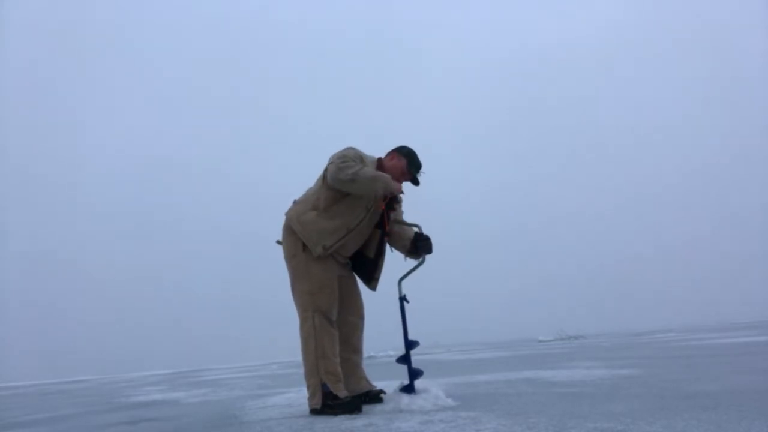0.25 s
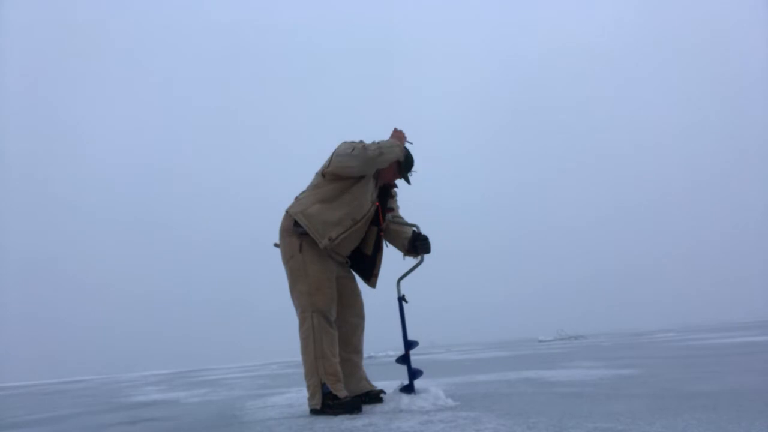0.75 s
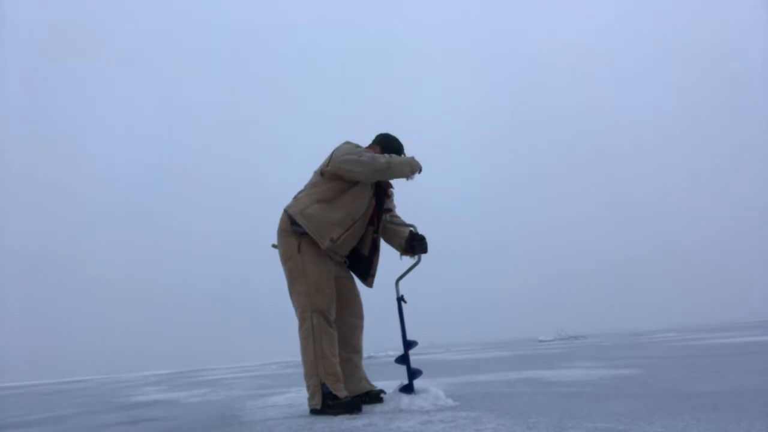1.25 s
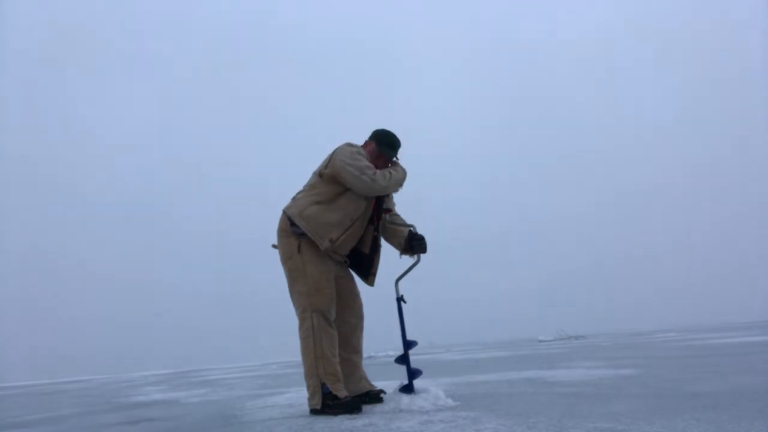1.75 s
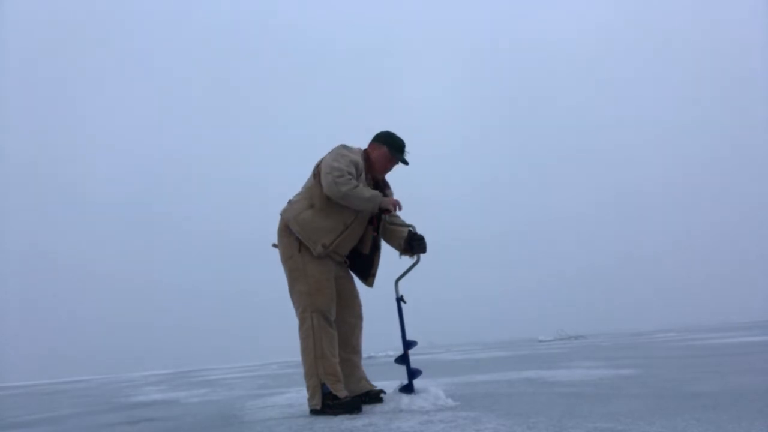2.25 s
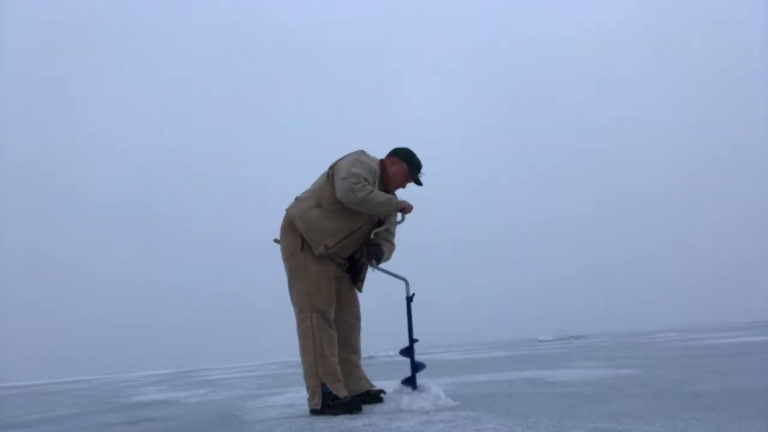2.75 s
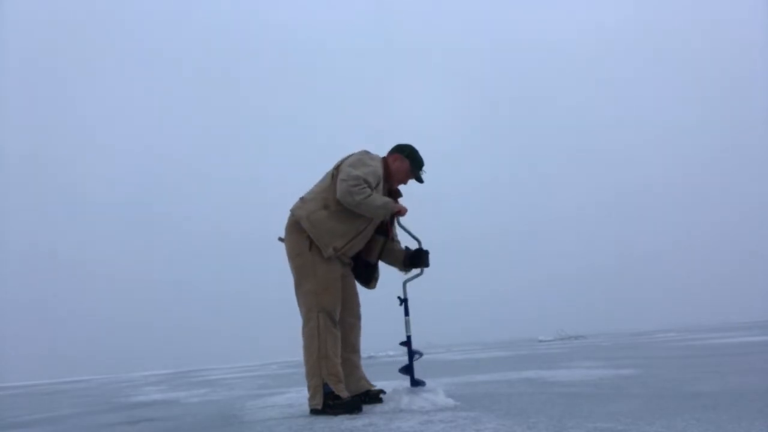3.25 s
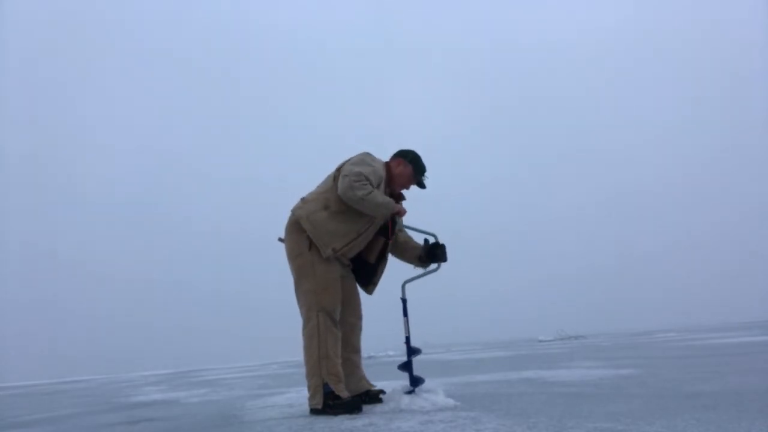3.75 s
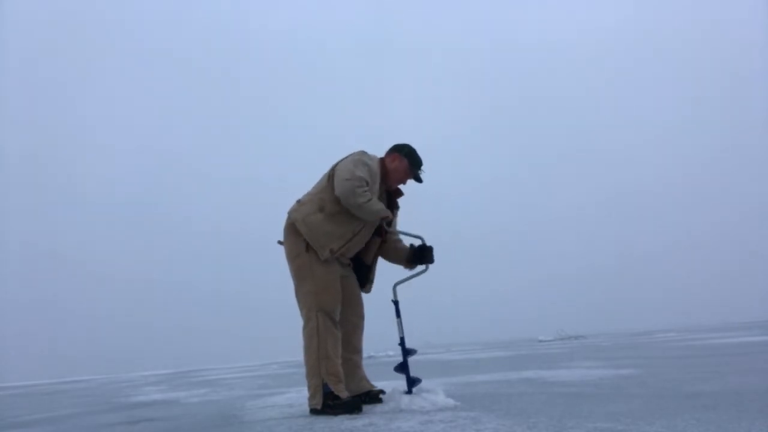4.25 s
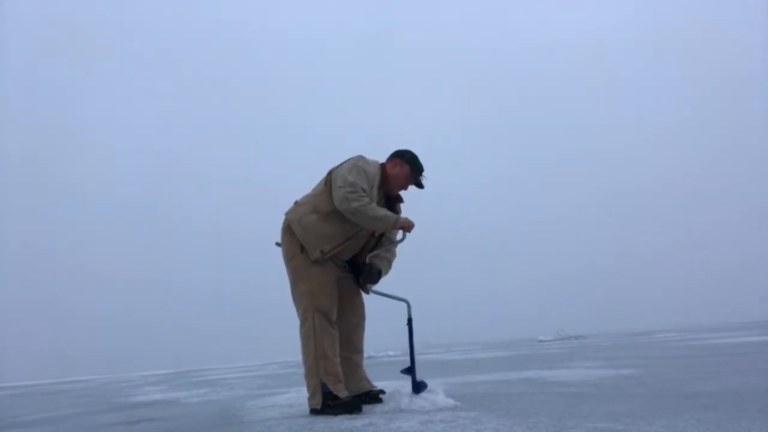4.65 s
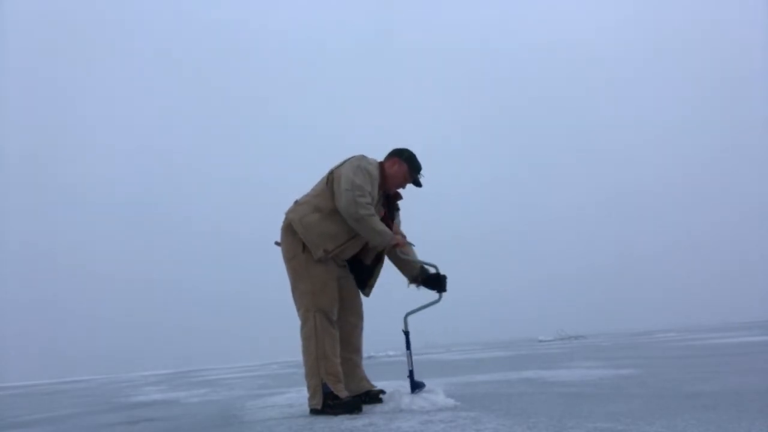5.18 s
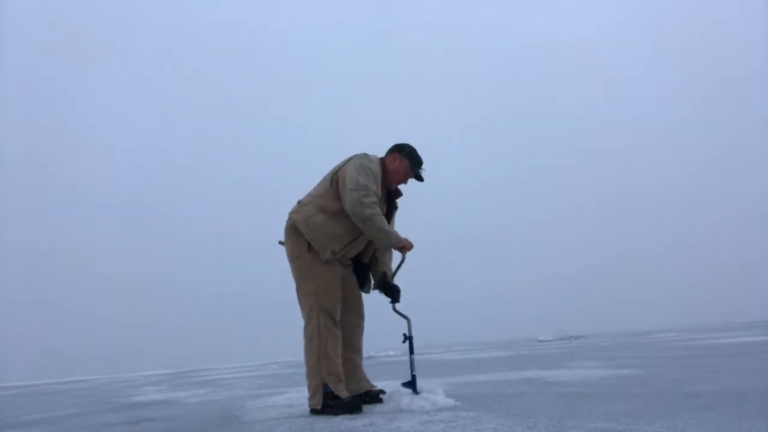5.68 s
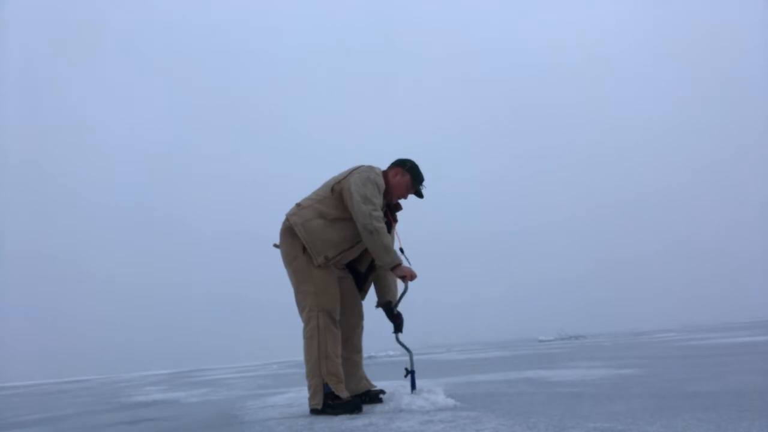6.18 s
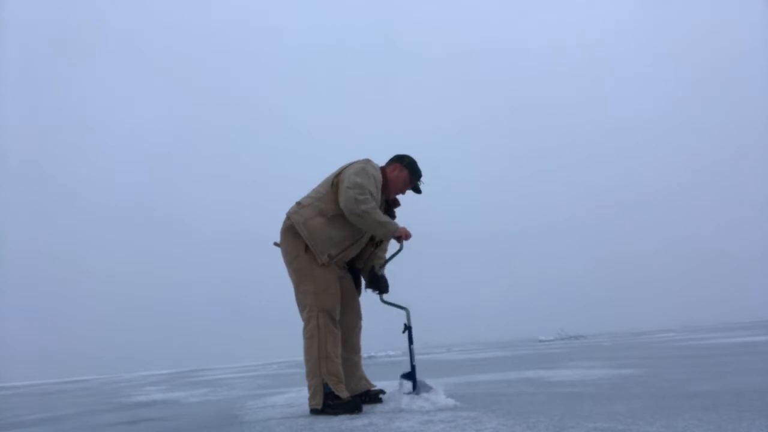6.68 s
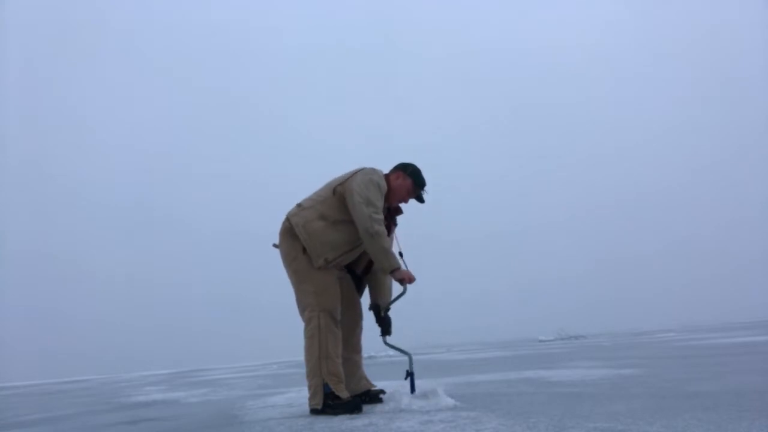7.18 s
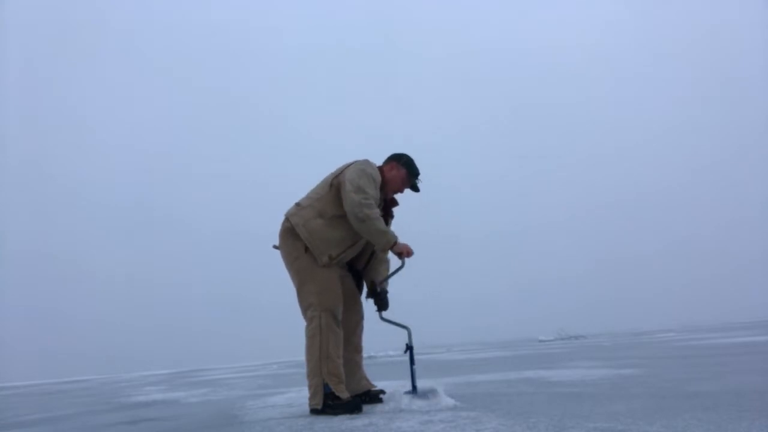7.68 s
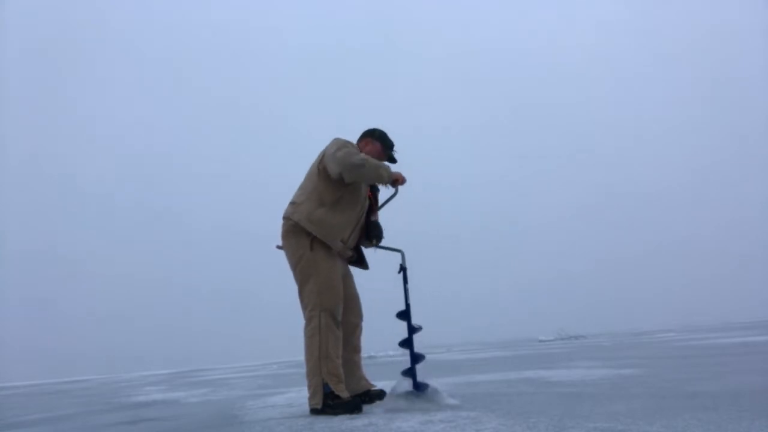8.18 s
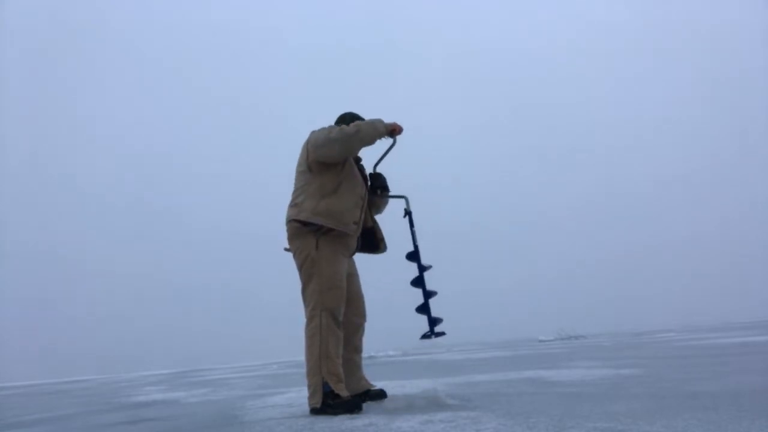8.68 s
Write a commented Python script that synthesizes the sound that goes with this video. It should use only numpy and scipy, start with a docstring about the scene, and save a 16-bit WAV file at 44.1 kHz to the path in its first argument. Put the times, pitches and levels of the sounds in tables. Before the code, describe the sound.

A hand-cranked auger crunches through dry lake ice in fits and starts, breaks into sloshing, gurgling slush, then lifts out dripping in faint wind.

```python
"""A hand auger bores through lake ice, in open air with a light wind.
The steel blades shave dry ice, stall, chip and break through: runs and bursts of tiny random fractures.
Then the spiral churns slush and water in the hole: swarms of short bubbles, slaps and gliding gulps.
It is lifted out with slush spilling off it. The blades ring, small ticks and drops tap, and a faint echo
tail, rumbling wind and rustling air made from filtered noise lie behind it all."""
import sys
import numpy as np
from scipy import signal
from scipy.io import wavfile
from scipy.ndimage import uniform_filter1d

SR = 44100
rng = np.random.default_rng(int(sys.argv[2]) if len(sys.argv) > 2 else 0)


def generate_wav(sig):
    """Save sig (samples, or channels by samples) to the path in sys.argv[1] as 16-bit PCM at SR."""
    pcm = np.round(np.clip(np.atleast_2d(sig).T, -1, 1) * 32767).astype(np.int16)
    wavfile.write(sys.argv[1], SR, pcm)


N = 393813
TIME = np.arange(N) / SR
# water enters the hole, the spiral leaves it, the last slush has run off
FLOOD_S, LIFT_S, DRAINED_S = 5.45, 7.915, 8.49


def amp(db):
    """Turns decibels into a gain."""
    return 10 ** (np.asarray(db) / 20)


def unit(x):
    """Scales a sound to an average (rms) level of one."""
    return x / np.sqrt(np.mean(x ** 2) + 1e-20)


def add(mix, s, sound):
    """Mixes a sound in, starting at s seconds."""
    part = mix[max(round(s * SR), 0):][:len(sound)]
    part += sound[:len(part)]


def follow(rows):
    """Gain curve through rows of (time_s, level_db), silent before the first and after the last."""
    s, db = np.transpose(rows)
    inside = np.interp(TIME, s, np.ones(len(s)), 0, 0)
    return inside * amp(np.interp(TIME, s, db))


def strokes(rows, attack_s, sag_db_per_s, release_s):
    """Gain from rows of (start_s, length_s, level_db): each sets in, sags while it lasts, and dies away."""
    gain = np.zeros(N)
    for start, length, db in rows:
        t = TIME - start
        edges = np.minimum(t, 0) / attack_s - np.maximum(t - length, 0) / release_s
        near = edges > -10
        sagging = amp(db - sag_db_per_s * np.clip(t[near], 0, length))
        gain[near] = np.maximum(gain[near], sagging * np.exp(edges[near]))
    return gain


def swells(rows):
    """Gain from rows of (middle_s, half_width_s, level_db): each is a smooth hump."""
    return sum(amp(db) * np.exp(-np.minimum(((TIME - s) / width) ** 2, 20)) for s, width, db in rows)


def colour(x, points, size=4096):
    """Filters to a given spectrum without any sound ahead of a click, so that clicks keep their attack."""
    hz, db = np.transpose(points)
    bin_hz = abs(np.fft.fftfreq(size, 1 / SR))
    log_gain = np.log(amp(np.interp(np.log(bin_hz + 1), np.log(hz), db)))
    minimum_phase = np.exp(np.conj(signal.hilbert(log_gain)))
    taps = np.fft.ifft(minimum_phase).real[:size // 2]
    return signal.oaconvolve(x, taps)[:len(x)]


def band(x, hz, kind, order=3):
    """Keeps what lies below ("low") or above ("high") a frequency."""
    return signal.sosfilt(signal.butter(order, hz, kind, fs=SR, output="sos"), x)


def resonate(x, hz, width_hz):
    """A resonance with a gain of one at its centre."""
    return signal.lfilter(*signal.iirpeak(hz, hz / width_hz, fs=SR), x)


def steady(x, seconds):
    """Evens out the slow changes of level and leaves the fine grain."""
    size = int(seconds * SR)
    power = uniform_filter1d(uniform_filter1d(x ** 2, size), size)
    return x / np.sqrt(abs(power) + 1e-3 * np.mean(x ** 2))  # the small floor avoids lifting silence


def grains(per_s, spread_db, clump_db, clump_s):
    """Tiny fractures: single-sample clicks of very unequal size, swelling and thinning in clumps."""
    sizes = amp(spread_db * np.minimum(rng.exponential(1, N), 4)) * rng.choice([-1, 1], N)
    clumps = unit(band(rng.standard_normal(N), 1 / (2 * np.pi * clump_s), "low", order=2))
    return sizes * (rng.random(N) < per_s / SR) * amp(clump_db * clumps)


def bubbles(low_hz, high_hz, per_s, cycles, rise, count=28):
    """A swarm of short bubbles, each a decaying tone that rises a little in pitch as it dies."""
    out = np.zeros(N)
    for hz in np.geomspace(low_hz, high_hz, count):
        # life reaches one when the tone has made this many cycles
        life = np.arange(int(5 * cycles / hz * SR)) * hz / (cycles * SR)
        tone = np.sin(2 * np.pi * cycles * life * (1 + rise * life))
        ping = tone * np.exp(-life) * (1 - np.exp(-6 * life))
        births = np.flatnonzero(rng.random(N) < per_s / count / SR)
        train = np.zeros(N)
        train[births] = amp(3.45 * np.minimum(rng.exponential(1, len(births)), 3))
        out += signal.oaconvolve(train, ping)[:N]
    return out


# resonances of the auger seated in the ice: (pitch_hz, width_hz, level_db over the direct sound)
AUGER_RESONANCES = [(222, 25, -4), (332, 47, -4), (803, 32, -18), (1500, 280, -0.5), (2920, 210, 3),
                    (4025, 170, 0), (7250, 27, 9.5), (7330, 31, -7)]


def auger_body(x):
    """The shaft and spiral add their resonances to whatever the blades do."""
    return x + sum(amp(db) * resonate(x, hz, width) for hz, width, db in AUGER_RESONANCES)


def turning(x, drift_s=0.07, t60=0.02, size=1024):
    """The spiral rattles after each fracture, in colours that keep changing as the auger turns."""
    out, hop = np.zeros(N), int(drift_s * SR)
    fade = np.sin(np.pi * np.arange(2 * hop) / (2 * hop))
    decay = amp(-60 * np.arange(size) / SR / t60)
    for i in range(0, N - 2 * hop, hop):
        tail = rng.standard_normal(size) * decay  # a new rattle for each overlapping slice
        rattle = signal.fftconvolve(x[i:i + 2 * hop] * fade, tail / np.linalg.norm(tail))
        add(out, i / SR + 0.003, rattle)
    return out


# tone colour of blades in dry ice: (pitch_hz, level_db)
SHAVING_COLOUR = [(60, -47), (120, -18), (230, -13), (335, -6), (540, -12.5), (750, -2.5), (1500, -4.5),
                  (2300, -9.5), (3400, -16), (7000, -19.5), (8200, -25.5), (16000, -30.5)]
# the one long run of the blades through dry ice: (time_s, level_db)
LONG_RUN = [(2.36, -67), (2.44, -51.5), (2.48, -35.5), (2.575, -25.5), (2.66, -28), (2.81, -36),
            (2.87, -27.5), (2.96, -28), (3.02, -33), (3.25, -30.5), (3.395, -43.5), (3.44, -84)]
# short shoves on the crank before the blades stall again: (start_s, length_s, level_db)
CRANK_SHOVES = [(3.775, .11, -41.5), (3.945, 0.027, -44.5), (4.1, .07, -47), (4.205, 0.036, -24.5),
                (4.37, 0.012, -36), (4.915, 0.098, -54.5)]
DRUM_DB, SPRAY_DB = -13.5, -5.5  # ice sheet and chips against the cutting level
# the sheet drums harder as the long run grinds to a halt
STALL_S, STALL_WIDTH_S, STALL_DRUM_DB = 3.41, 0.13, 13


def shaving():
    """Blades plane dry ice: a run of fractures that drums on the sheet and throws a fine spray of chips."""
    clicks = grains(per_s=2400, spread_db=3.5, clump_db=2.5, clump_s=0.0032)
    fractures = auger_body(colour(clicks, SHAVING_COLOUR))
    fractures = unit(fractures) + amp(-3.0) * unit(turning(fractures))
    crunch = steady(band(band(fractures, 2450, "low"), 494, "high", order=4), 0.024)
    sheet = steady(band(fractures, 398, "low", order=5), 0.036)
    spray = steady(band(fractures, 4600, "high"), 0.021)
    shoves = strokes(CRANK_SHOVES, attack_s=0.021, sag_db_per_s=34, release_s=0.027)
    level = follow(LONG_RUN) + shoves
    drum = amp(DRUM_DB + STALL_DRUM_DB * np.exp(-((TIME - STALL_S) / STALL_WIDTH_S) ** 2))
    # the edges catch and slip
    catch = amp(1.7 * unit(band(rng.standard_normal(N), 35, "low", order=2)))
    return level * catch * (amp(-1.0) * crunch + drum * sheet + amp(SPRAY_DB) * spray)


def cascade_burst(db, hz, treble_db, decay_s, build_s, thud_db, size=4096):
    """A quick cascade of fractures: a bright snap, a hollow knock from the hole and a low thud."""
    t = np.arange(size) / SR
    since = t - 4 * build_s  # small fractures lead up to the break
    noise, uneven = rng.standard_normal((2, size))
    cascade = noise * amp(1.3 * uneven) * np.exp(np.minimum(since / build_s, -since / decay_s))
    knock = band(band(resonate(cascade, hz, 650), 583, "high"), 2080, "low", order=2)
    snap = band(band(cascade, 2600, "high", order=2), 3900, "low", order=1)
    thud = band(band(cascade, 370, "low"), 196, "high")
    burst = amp(-9) * unit(knock) + amp(treble_db - 8) * unit(snap) + amp(thud_db) * unit(thud)
    return amp(db) * burst * np.sqrt(0.8 * decay_s / t[-1])


# dry ice breaking: (time_s, level_db, pitch_hz of the hollow knock)
ICE_CRACKS = [(2.478, -20.5, 1370), (2.567, -20.5, 1400), (2.765, -13, 1450), (2.83, -23, 1460),
              (2.868, -22, 1180), (3.309, -17, 956), (3.398, -25.5, 899), (3.47, -49.5, 1400),
              (3.548, -43.5, 1430), (3.626, -47.5, 1760), (3.751, -29.5, 1530), (3.774, -30, 1490),
              (4.185, -12.5, 1050), (4.226, -14, 1510), (4.359, -22.5, 1810), (4.815, -38.5, 1560),
              (4.888, -34.5, 611), (4.911, -30.5, 700), (4.921, -34, 1000), (4.957, -30.5, 622),
              (4.972, -31.5, 1630), (5.0, -27, 1140), (5.012, -25, 1130), (5.025, -38, 1310),
              (5.234, -34.5, 1820), (5.256, -17, 1200), (5.278, -18.5, 1180), (5.285, -24, 925)]
# snap setting for a 0 dB crack, and its dB per dB of crack level: small cracks are mostly snap
SNAP_DB, SNAP_GROWTH = -23, 0.46


def cracks(decay_s=0.0068, build_s=0.0008):
    """Dry ice breaks in sudden, short cascades, the small ones brighter than the large."""
    out = np.zeros(N)
    for s, db, hz in ICE_CRACKS:
        treble_db = SNAP_DB + SNAP_GROWTH * db - db
        add(out, s - 2.7 * build_s, cascade_burst(db, hz, treble_db, decay_s, build_s, thud_db=-21))
    return out


# slush slapping in the hole: (time_s, level_db, pitch_hz of the hollow knock)
SLUSH_SLAPS = [(5.461, -34, 630), (5.492, -23, 900), (5.598, -14, 1110), (5.695, -16.5, 1070),
               (5.787, -13, 1460), (5.844, -17, 1570), (5.926, -23, 1040), (6.214, -28.5, 603),
               (6.355, -31.5, 610), (6.438, -21.5, 1004), (6.476, -22.5, 1070), (6.497, -25.5, 1120),
               (6.523, -22, 966), (6.556, -10, 940), (6.585, -20, 1470), (6.636, -29.5, 1180),
               (6.705, -15, 850), (6.788, -20, 930), (6.81, -10, 1020), (6.958, -21.5, 640),
               (7.138, -27.5, 912), (7.283, -25, 1240), (7.38, -14.5, 1200), (7.569, -21.5, 1170),
               (7.625, -14, 859), (7.697, -22, 960), (7.764, -8, 990), (7.867, -15.5, 673),
               (8.081, -15.5, 910)]


def slaps(decay_s=0.0088, build_s=0.0017):
    """Water slows the start of each blow, draws it out and cushions its thump."""
    out = np.zeros(N)
    for s, db, hz in SLUSH_SLAPS:
        burst = cascade_burst(db, hz, treble_db=-18.5, decay_s=decay_s, build_s=build_s, thud_db=-34)
        add(out, s - 2.7 * build_s, burst)
    return out


# tone colour of wet slush: (pitch_hz, level_db)
SLUSH_COLOUR = [(120, -44), (200, -41.5), (263, -22), (316, 5.5), (465, -3), (821, -11.5), (950, -6.5),
                (1370, -6), (3430, -22), (7010, -19), (8420, -25.5), (16000, -29.5)]
# surges of slush as the spiral turns and is pumped:
# (start_s, length_s, level_db, deep_db: deep water against that level)
SLUSH_SURGES = [(5.468, 0.1, -26.5, -7), (5.596, .11, -25, -2.5), (5.787, 0.0089, -24, -7.5),
                (5.854, 0.014, -34, -8), (5.924, 0.082, -43.5, -1), (6.162, 0.22, -48.5, 3.5),
                (6.44, 0.18, -44.5, 0.5), (6.707, 0.036, -30.5, -8), (6.786, 0.081, -27.5, -9.5),
                (6.958, 0.2, -33, -3), (7.382, .11, -36.5, 3.5), (7.581, 0.068, -30, -10),
                (7.7, 0.2, -25, 1), (7.965, .135, -28.5, -11)]
STIR_DB = -58  # water moving between surges
# ice crumbs against the churning level at its height, and the extra dB they gain per dB of churning
FIZZ_DB, FIZZ_GROWTH = -13.5, 0.082


def churning():
    """The spiral stirs wet slush: squelching bubbles, deeper water below, and fizzing ice crumbs."""
    attack_s, sag_db_per_s, release_s = 0.0084, 33.5, 0.022
    stir = strokes([(FLOOD_S, LIFT_S - FLOOD_S, STIR_DB)], attack_s, 0, release_s)
    surge_rows = [(s, length, db) for s, length, db, _ in SLUSH_SURGES]
    deep_rows = [(s, length, db + deep_db) for s, length, db, deep_db in SLUSH_SURGES]
    level = np.maximum(stir, strokes(surge_rows, attack_s, sag_db_per_s, release_s))
    deep = np.maximum(stir, strokes(deep_rows, attack_s, sag_db_per_s, release_s))

    crumbs = colour(grains(per_s=2600, spread_db=2.0, clump_db=4.0, clump_s=0.0038), SLUSH_COLOUR)
    froth = colour(bubbles(low_hz=716.3, high_hz=2766, per_s=520, cycles=8.2, rise=0.018), SLUSH_COLOUR)
    crunch = band(band(crumbs, 2600, "low"), 710, "high")
    squelch = steady(unit(froth) + amp(-4) * unit(crunch), 0.035)

    gurgle = bubbles(low_hz=429.4, high_hz=685, per_s=150, cycles=4.3, rise=0.0064, count=12)
    # a faint low rumble under the gurgling water
    rumble = band(band(rng.standard_normal(N), 332, "low"), 152, "high")
    water = steady(unit(gurgle) + amp(-17.0) * unit(rumble), 0.018)

    beads = bubbles(low_hz=2867, high_hz=7664, per_s=700, cycles=22, rise=0.0037, count=20)
    hiss = steady(unit(band(crumbs, 2200, "high")) + amp(-4.5) * unit(beads), 0.13)
    fizz = amp(FIZZ_DB) * (level / level.max()) ** FIZZ_GROWTH * hiss
    return level * (amp(-2.5) * squelch + fizz) + amp(-4.5) * deep * water


# air pockets ringing in the hole: (start_s, level_db, pitch_hz at first, length_s)
AIR_GULPS = [(5.481, -20, 644, .036), (5.568, -23, 454, 0.03), (5.623, -20.5, 1072, 0.049),
             (5.628, -28.5, 453.4, 0.17), (5.782, -21.5, 535, 0.027), (5.924, -24.5, 1100, 0.024),
             (6.154, -38.5, 523, 0.042), (6.55, -15.5, 970, 0.023), (6.839, -18.5, 645, 0.037),
             (6.955, -31.5, 527, .033), (7.071, -25.5, 1208, 0.035), (7.162, -32.5, 460, 0.068),
             (7.254, -24.5, 456, 0.044), (7.286, -26.5, 395.3, 0.026), (7.639, -14, 823, 0.025),
             (7.701, -19, 470, 0.039), (7.762, -14.5, 931, 0.046), (7.763, -20.5, 449, 0.04),
             (7.795, -20.5, 330, 0.029), (7.862, -18, 660.7, 0.028), (7.902, -22, 693, 0.034),
             (7.92, -26, 520, 0.03), (8.043, -30, 383.6, 0.1), (8.079, -18, 844, 0.044)]
# short gulps sink in pitch and long ones rise, by up to this share
GLIDE, LEVEL_GULP_S, GLIDE_SPAN_S = 0.16, 0.037, 0.0095


def gulps(swell=0.21, waver=0.0066):
    """Large air pockets swell, glide as they change size, and die away."""
    out = np.zeros(N)
    for s, db, first_hz, length in AIR_GULPS:
        glide = GLIDE * np.tanh((length - LEVEL_GULP_S) / GLIDE_SPAN_S)
        u = np.arange(int(2 * length * SR)) / (length * SR)  # time in gulp lengths
        wobble = unit(band(rng.standard_normal(SR), 90, "low", order=2))[:len(u)]
        hz = first_hz * (1 + glide * np.minimum(u, 1)) * (1 + waver * wobble)
        shape = (u / swell * np.exp(1 - u / swell)) ** 1.08
        add(out, s, amp(db - 4.0) * shape * np.sin(2 * np.pi * np.cumsum(hz) / SR))
    return out


# the free ring of the steel blades: (pitch_hz, level_db, t60_s: time to fall 60 dB)
BLADE_MODES = [(2910, -27, 0.21), (5300, -12, .11), (6700, -11, 0.067), (6880, 9.5, 0.11),
               (7260, -22, 0.13)]
# the blades singing as they rub the wall of the hole: (middle_s, half_width_s, level_db)
WALL_RUBS = [(5.045, 0.029, -50), (5.62, .075, -47), (6.26, 0.079, -59.5), (6.62, .09, -59),
             (7.6, 0.064, -50)]


def steel(drive):
    """The blades answer any push at their own pitches, each dying at its own rate."""
    return sum(amp(db) * resonate(drive, hz, np.log(1000) / np.pi / t60) for hz, db, t60 in BLADE_MODES)


def blade_ring(x):
    """The thin blades ring after each blow, and sing in bursts as they rub the wall of the hole."""
    rubbed = steady(steel(grains(per_s=85, spread_db=11.5, clump_db=6, clump_s=0.013)), 0.071)
    return amp(1) * steel(x) + amp(0.5) * swells(WALL_RUBS) * rubbed


# tone colour of slush pouring off: (pitch_hz, level_db)
POUR_COLOUR = [(150, -25), (420, -10), (850, -15), (1250, -3), (2100, -11), (2900, -6), (3900, -20.5),
               (7000, -20.5), (8500, -27), (15000, -26.5)]


def spilling():
    """Slush runs off the lifted spiral in an even wash of tiny splashes."""
    splashes = unit(grains(per_s=7000, spread_db=1.5, clump_db=1.0, clump_s=0.0048))
    drops = unit(bubbles(low_hz=700, high_hz=3220, per_s=380, cycles=4, rise=0.01, count=20))
    spill = [(LIFT_S, DRAINED_S - LIFT_S, -39.5)]  # start_s, length_s, level_db
    flow = strokes(spill, attack_s=0.0041, sag_db_per_s=19, release_s=0.068)
    return flow * steady(colour(splashes + amp(-11.5) * drops, POUR_COLOUR), 0.043)


# small ticks of the crank and loose ice, and a few drops of water:
# (time_s, level_db at the peak, pitch_hz)
TICKS_AND_DROPS = [(0.047, -45.5, 1450), (0.047, -50, 3100), (0.421, -59, 6000), (2.147, -55, 4000),
                   (2.205, -47.5, 1670), (2.346, -44.5, 2130), (5.206, -45, 3450), (6.125, -38.5, 2280),
                   (7.289, -38.5, 4000), (8.693, -48, 2200)]


def ticks_and_drops(decay_s=0.0037, width_hz=700, size=2048):
    """Light taps and drops: short noise bursts through two resonances at one pitch."""
    out, t = np.zeros(N), np.arange(size) / SR
    for s, db, hz in TICKS_AND_DROPS:
        tap = rng.standard_normal(size) * np.exp(-t / decay_s)
        tap = resonate(resonate(tap, hz, width_hz), hz, 2 * width_hz)
        add(out, s, amp(db) * tap / abs(tap).max())
    return out


def scatter(x, t60=0.097, size=8192):
    """A short tail of random echoes from the hole and the rough ice around it."""
    t = np.arange(size) / SR
    tail = rng.standard_normal(size) * amp(-60 * t / t60) * (t > 0.003)
    return signal.oaconvolve(x, tail / np.linalg.norm(tail))[:N]


def droplets():
    """Stray drops plip and crumbs pop as long as the spiral is wet."""
    plips = bubbles(low_hz=537, high_hz=2350, per_s=100, cycles=6, rise=0.015, count=14)
    pops = bubbles(low_hz=1500, high_hz=7000, per_s=260, cycles=2, rise=0.01, count=14)
    drip = [(FLOOD_S, DRAINED_S - FLOOD_S, -55)]  # start_s, length_s, level_db
    # a negative sag makes the drops slowly grow
    wetness = strokes(drip, attack_s=0.01, sag_db_per_s=-3, release_s=0.015)
    return wetness * (amp(-7) * unit(plips) + amp(-11.5) * unit(scatter(pops, t60=0.034)))


# tone colours of the rustling air and of the wind: (pitch_hz, level_db)
AIR_COLOUR = [(88, -36.5), (150, -6), (259, -0.5), (321, 0), (759, -10.5), (1290, -5), (2100, -13.5),
              (2920, -12), (4860, -17), (7040, -17.5), (10400, -23.5), (15100, -21.5), (16000, -31)]
WIND_COLOUR = [(12, -32.5), (20, -35.5), (48, 3.5), (103, -4.5), (128, -5.5), (184, -25.5), (220, -23),
               (290, -69.5), (480, -120)]
# gusts of wind, then rustles of the coat: (middle_s, half_width_s, level_db)
GUSTS = [(1.25, 0.42, -63), (2.7, 0.44, -67), (5.6, 0.46, -59.5), (6.6, 0.15, -62.5), (8.3, 0.48, -61.5),
         (8.66, 0.058, -49)]
COAT_RUSTLES = [(1.18, 0.056, -75), (2.15, 0.37, -73), (3.68, 0.078, -71), (4.78, 0.18, -62)]
BREEZE_DB, HUSH_DB = -65.5, -67.5  # the steady wind and air under everything


def open_air():
    """Lumpy wind on the microphone under a faint rustling hush."""
    lumps = amp(3.6 * unit(band(rng.standard_normal(N), 6.9, "low", order=2)))
    wind = steady(colour(rng.standard_normal(N), WIND_COLOUR, size=16384) * lumps, 0.2)
    hush = unit(colour(grains(per_s=5300, spread_db=2.0, clump_db=1.28, clump_s=0.015), AIR_COLOUR))
    wind_level = amp(BREEZE_DB) + swells(GUSTS)
    hush_level = amp(HUSH_DB) + swells(COAT_RUSTLES)
    return wind_level * band(wind, 260, "low") + hush_level * hush


def scene():
    """The auger at work on the open lake."""
    ice = shaving() + cracks() + slaps() + churning() + ticks_and_drops()
    work = ice + blade_ring(ice) + gulps() + spilling() + droplets()
    return (work + amp(-11.5) * scatter(work) + open_air())[None]


def record(dry):
    """A small microphone with a dip in the high treble, then a steep cut above 15900 Hz."""
    heard = dry - 0.5 * resonate(dry, 10470, 890)
    low_pass = signal.firwin(511, 15900, window=("kaiser", 9), fs=SR)
    return signal.oaconvolve(heard, low_pass[None], "same", axes=1)


dry = scene()
out = record(dry)
generate_wav(out)
```